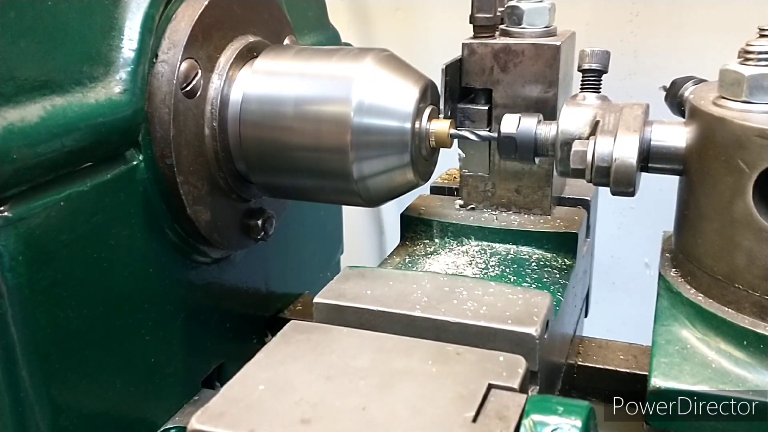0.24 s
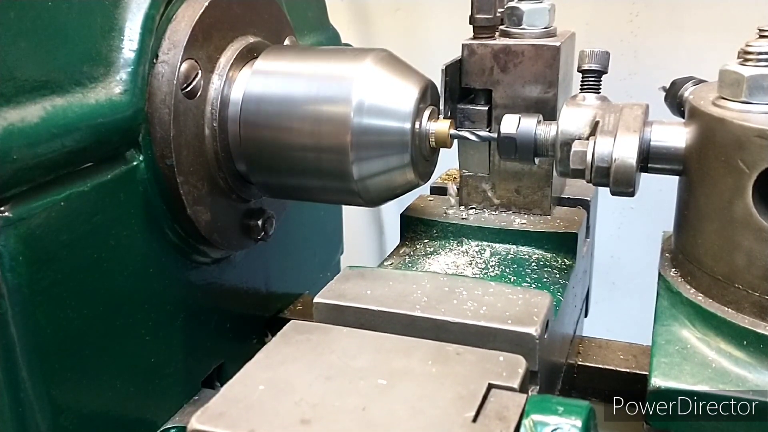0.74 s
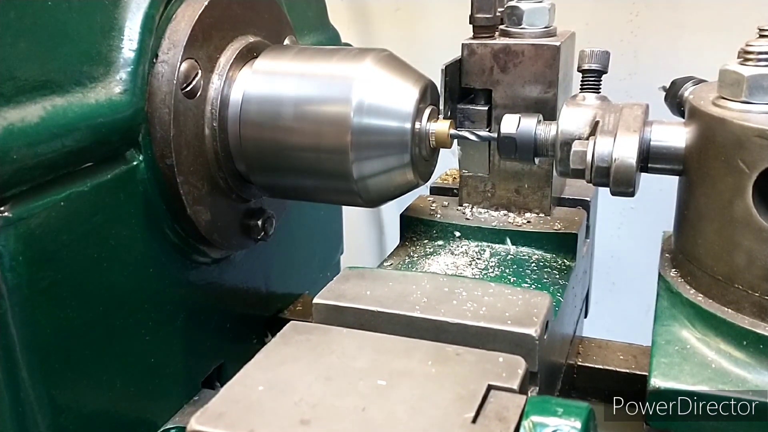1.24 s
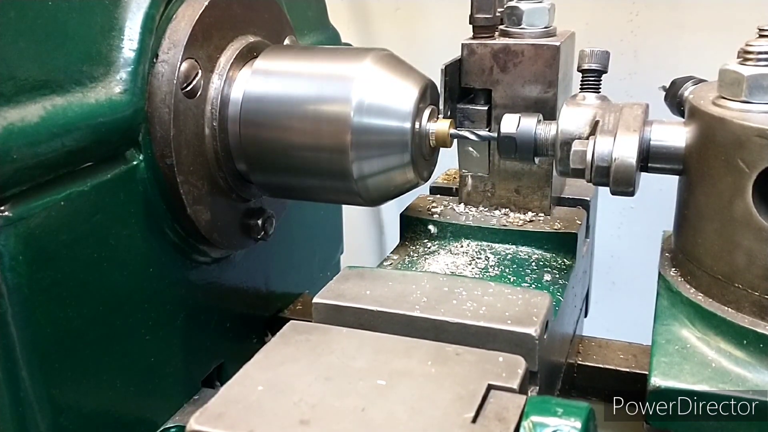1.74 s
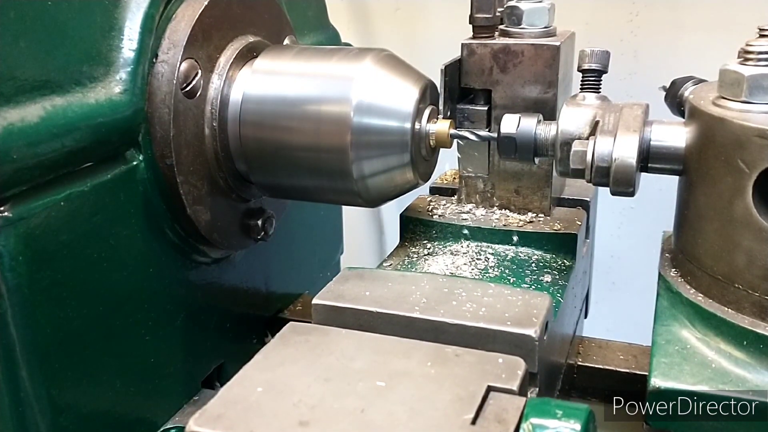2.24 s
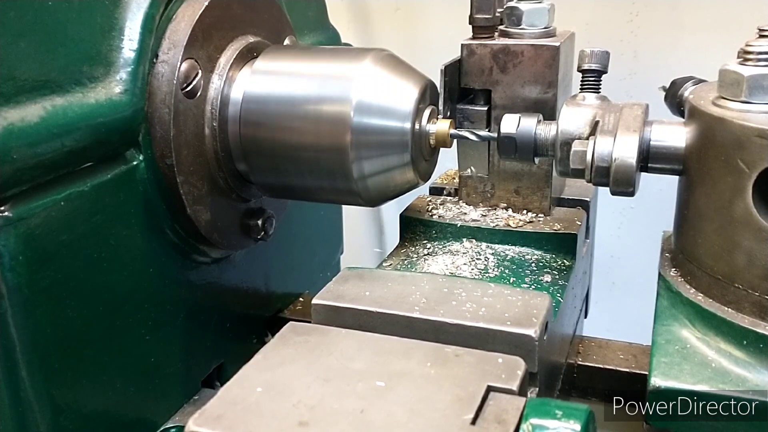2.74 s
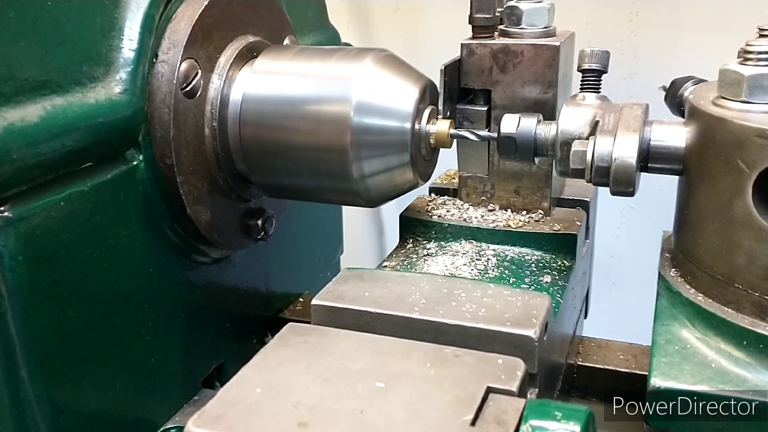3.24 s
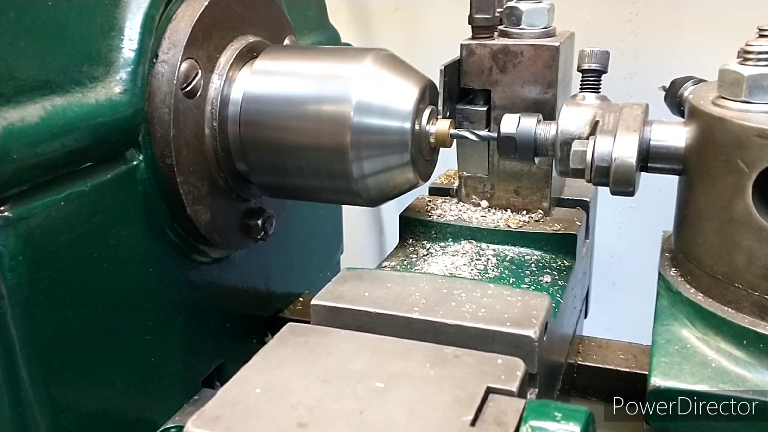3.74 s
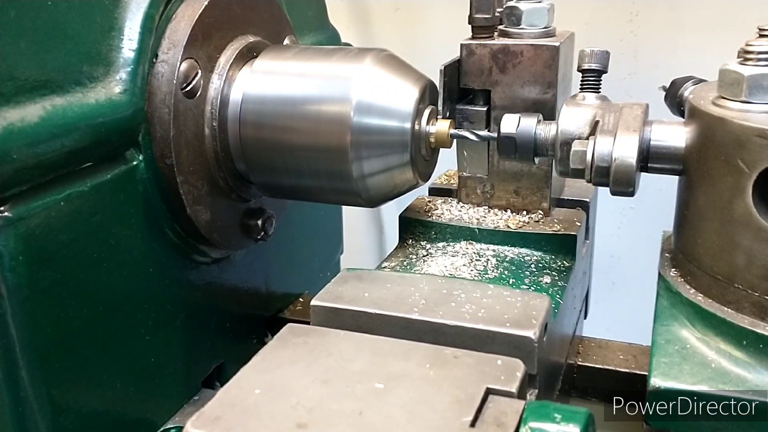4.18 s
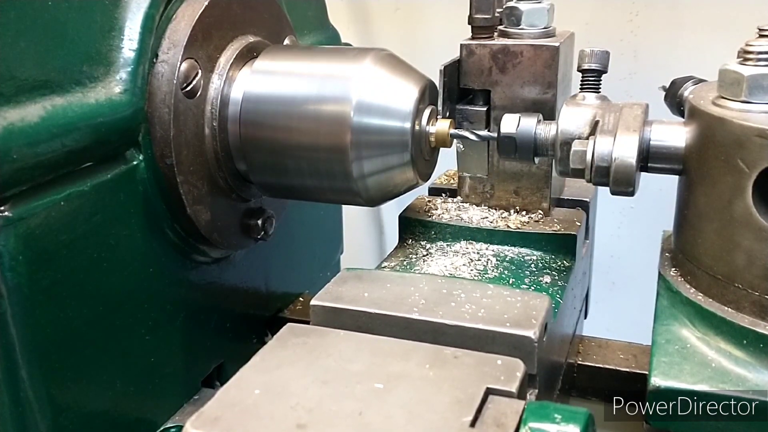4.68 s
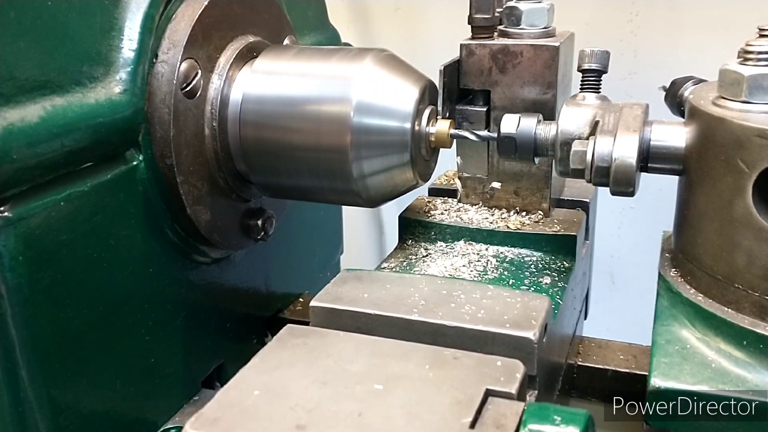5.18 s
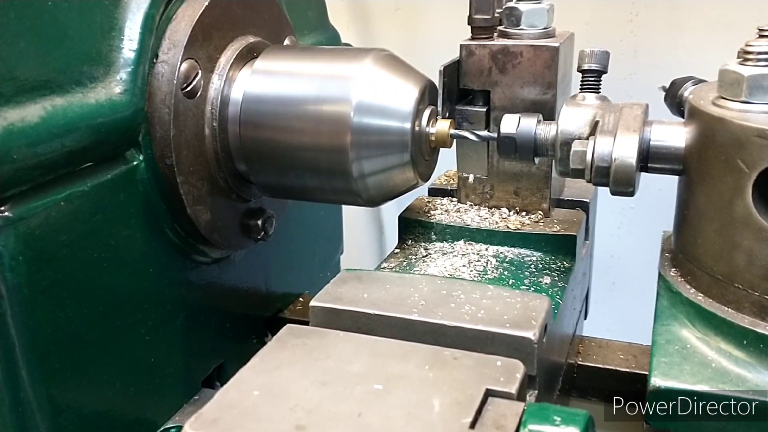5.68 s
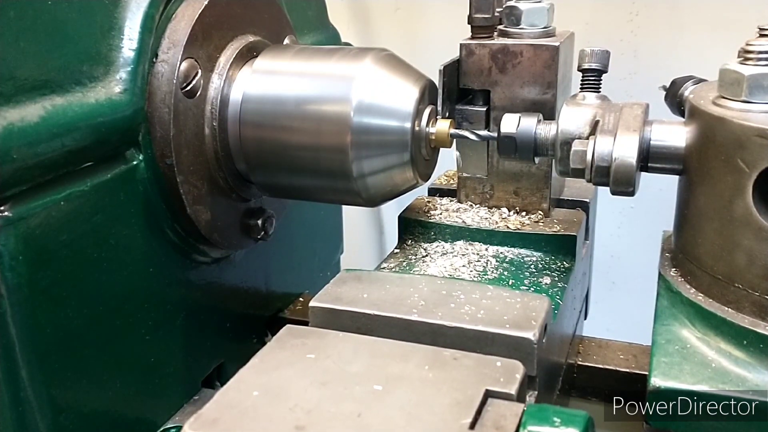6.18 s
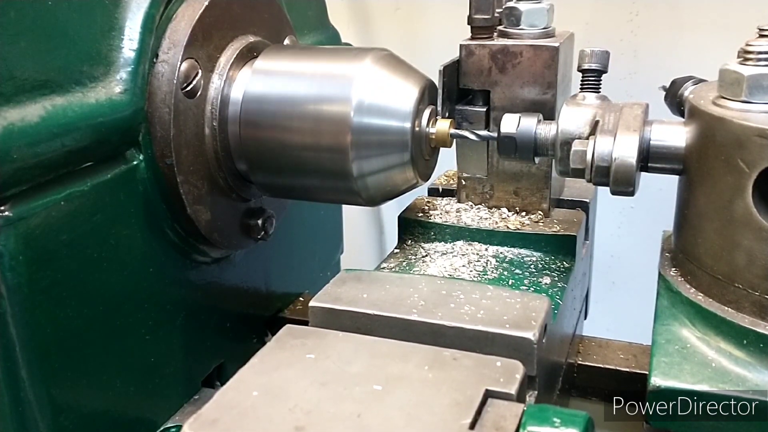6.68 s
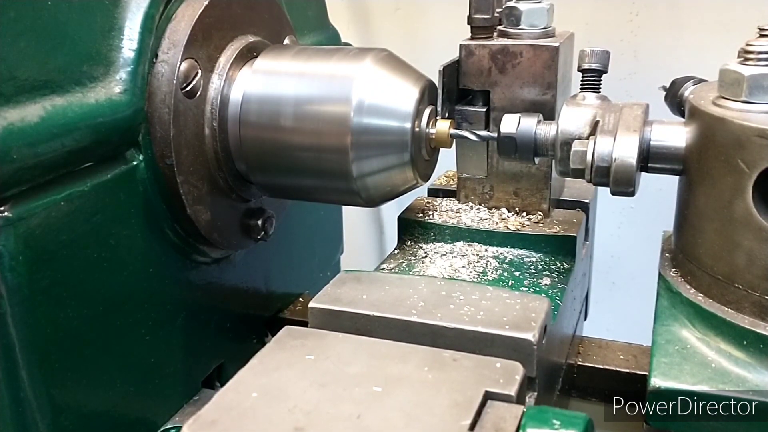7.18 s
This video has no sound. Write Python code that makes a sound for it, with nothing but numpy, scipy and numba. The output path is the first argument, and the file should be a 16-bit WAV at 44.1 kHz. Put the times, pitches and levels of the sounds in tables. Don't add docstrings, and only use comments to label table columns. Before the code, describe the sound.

Close stereo pickup in a small workshop: a lathe motor hums and whirrs while the spindle ticks about fifteen times a second. Brief scrapes and soft knocks come first, then a short lull. From one second the blade cuts brass in harsh, bright pulses about eight a second, each screech dipping in pitch at its deepest bite. They are loudest early, then grow lower, grainier and quieter to the end.

```python
import sys
import numpy as np
from scipy import signal
from scipy.fft import rfft, irfft, next_fast_len
from scipy.io import wavfile
from scipy.ndimage import uniform_filter1d
from numba import njit

SR = 44100
rng = np.random.default_rng(int(sys.argv[2]) if len(sys.argv) > 2 else 0)


def boost(x):
    u = np.asarray(x, float) / 20
    return 10 ** u


def to_wav(s):
    ch = np.atleast_2d(s).T
    pcm = np.round(np.clip(ch, -1, 1) * 32767)
    wavfile.write(sys.argv[1], SR, pcm.astype(np.int16))


N = 327222

SPINDLE_HZ, FIRST_TICK_S = 15.0027, .0548
# [t/s, level/dB]
GRAZES = [
    (.013, -63),
    (.078, -55),
    (.142, -53),
    (.21, -44.5),
    (.281, -37.5),
    (.349, -36.5),
    (.421, -29.5),
    (.493, -33),
    (.563, -48),
    (.63, -57),
]
GRAZE_HALF_S = .010


def set_rms(x, db):
    return x * boost(db) / np.sqrt(np.mean(x ** 2))


def walk(rate_hz):
    k = int(SR / rate_hz)
    held = np.repeat(rng.standard_normal(N // k + 1), k)
    return 1.3 * uniform_filter1d(uniform_filter1d(held, k), k)[:N]


def resonance(f, hz, width_hz):
    return 1 / (1 + 1j * (f / hz - hz / np.maximum(f, 1)) * hz / width_hz)


def colour(f, hz, db):
    return boost(np.interp(np.log(np.maximum(f, 1)), np.log(hz), db))


def causal(gain):
    cep = irfft(np.log(gain))
    half = cep.shape[-1] // 2
    return np.exp(rfft(cep * np.r_[1, np.full(half - 1, 2), 1, np.zeros(half - 1)]))


def smear(t60_s, direct):
    t = np.arange(SR // 4) / SR
    tail = rng.standard_normal((2, len(t))) * np.exp(-np.log(1000) * t / t60_s)
    tail = tail / np.sqrt(np.sum(tail ** 2, axis=1, keepdims=True))
    return tail + direct * (t == 0)


@njit
def svf(x, hz, k):
    low, high, b, l = np.empty(len(x)), np.empty(len(x)), 0., 0.
    for i in range(len(x)):
        g = np.tan(np.pi * hz[i] / SR)
        v = (b + g * (x[i] - l)) / (1 + g * (g + k))
        low[i] = l + g * v
        high[i] = x[i] - k * v - low[i]
        b, l = 2 * v - b, 2 * low[i] - l
    return low, high


def band(x, low_hz, high_hz):
    low_hz = np.clip(low_hz, 200, .4 * SR) + np.zeros(len(x))
    high_hz = np.clip(high_hz, 200, .45 * SR) + np.zeros(len(x))
    for _ in range(3):
        x = svf(x, low_hz, 1.025)[1]
    return svf(x, high_hz, 1.0)[0]


def motor():
    # [multiple, left/dB, right/dB, wobble/dB, left lead/rad]
    hum_lines = [(1, -40.3, -40.6, .15, -.06), (2, -53.5, -55, 1.8, .2), (3, -44, -47, .4, -.62),
                 (4, -53, -54.5, .6, -.55)]
    # [f/Hz, density/dB per Hz]
    whirr_spectrum = [(15, -62), (25, -19), (43, -18), (66, -13), (101, -4), (150, -8), (301, -7.5),
                      (515, -9.5), (1310, -11), (1730, -13.5), (2810, -14.5), (3310, -24), (6500, -33.5),
                      (8450, -75), (14300, -120)]
    # [f/Hz, width/Hz, level/dB]
    housing_modes = [(177.6, 3.4, -57), (251, 35, -54), (371.7, 5, -61.5)]
    t = np.arange(N) / SR
    turn = 2 * np.pi * np.cumsum(100.24 + 0.086 * walk(0.94)) / SR
    hum = np.zeros((2, N))
    for k, left_db, right_db, wobble_db, lead in hum_lines:
        gain = np.sqrt(2) * boost(np.array([[left_db], [right_db]]) + wobble_db * walk(8.3))
        hum += gain * np.sin(k * turn + 6 * rng.random() + lead * np.array([[1], [0]]))
    size = next_fast_len(N + 1)
    f = np.arange(size // 2 + 1) * SR / size
    mid, side = rfft(rng.standard_normal((2, size)))
    apart = np.clip(f / 1000, .27, 1.1) * np.array([[1], [-1]])
    whirr = irfft(colour(f, *np.transpose(whirr_spectrum)) * (mid + apart * side), size)
    whirr = set_rms(whirr, -46)[:, :N]
    whirr = whirr * boost(1.2 * np.cos(2 * np.pi * SPINDLE_HZ * (t - FIRST_TICK_S - .01)))
    housing = np.zeros(size)
    for hz, width_hz, db in housing_modes:
        noise = rfft(rng.standard_normal(size))
        housing += set_rms(irfft(resonance(f, hz, width_hz) * noise, size), db)
    return hum + whirr + housing[:N]


def rings(modes, tilt_db=0., spread=0., rise_s=0.0011):
    t = np.arange(SR // 8) / SR
    y = np.zeros(len(t))
    for hz, db, t60_s in modes:
        gain = boost(db + tilt_db * np.log2(hz / 1000) + 2 * rng.standard_normal())
        detuned_hz = hz * (1 + spread * rng.standard_normal())
        y += gain * np.sin(2 * np.pi * (detuned_hz * t + rng.random())) * np.exp(-np.log(1000) * t / t60_s)
    y = y * np.minimum(t / rise_s, 1)
    return y / np.abs(y).max()


def blows():
    # [f/Hz, level/dB, t60/s]
    tick_modes = [(822, 2.5, 0.085), (1168, 8.5, 0.058), (1386, 4, 0.08), (1659, 10, 0.089),
                  (1762, 14, 0.058), (2085, 11.5, 0.044), (2590, 11.5, 0.02), (2960, -11, 0.046)]
    # [f/Hz, level/dB, t60/s]
    knock_modes = [(566, 3, 0.084), (665, 16, 0.062), (855, 18, 0.017), (1037, 18, 0.035), (1424, 5.5, 0.1),
                   (1760, 10, 0.016), (2190, 7.6, 0.011), (2590, 6.7, 0.025), (2950, 10, 0.023),
                   (3460, 6, 0.011)]
    # [t/s, peak/dB, brightness/dB per octave]
    knocks = [
        (0.019, -39, -1),
        (0.085, -39, -2),
        (0.153, -38.5, -1),
        (0.22, -37, -0.5),
        (0.284, -33.5, 3),
    ]
    out = np.zeros(N + SR)
    for s in FIRST_TICK_S + np.arange(int(N / SR * SPINDLE_HZ)) / SPINDLE_HZ:
        i = int((s + 0.000532 * rng.standard_normal()) * SR)
        out[i:i + SR // 8] += boost(-39 + 1.2 * rng.standard_normal()) * rings(tick_modes, spread=0.012)
    for s, db, tilt_db in knocks:
        for late_s, bounce_db in ((0, 7.5), (.007, 1), (.015, -8)):
            i = int((s + late_s) * SR)
            knock = rings(knock_modes, tilt_db, spread=0.0097, rise_s=0.00067)
            out[i:i + SR // 8] += boost(db + bounce_db) * knock
    return signal.fftconvolve(out[None, :N], smear(.12, 1.3), axes=1)[:, :N]


def bites():
    # [deepest t/s, level/dB, needle rate there/Hz, dig in/ms, spring out/ms]
    rim_bites = [(1.005, -33.5, 6870, 46, 40), (1.091, -28.5, 7350, 31.5, 32), (1.178, -27.5, 6770, 35, 39),
                 (1.278, -23.5, 6660, 44, 37), (1.372, -17, 5890, 43, 39), (1.475, -18.5, 6585, 40, 35.5),
                 (1.596, -21.5, 5670, 45.0, 52), (1.729, -19.5, 5463, 41.0, 31),
                 (1.833, -16.5, 5240, 49.6, 41), (1.95, -15.5, 5150, 30.5, 58.7),
                 (2.074, -16, 4800, 57.3, 36.6), (2.174, -16, 4786, 52, 47), (2.297, -16, 4740, 54.0, 45),
                 (2.42, -17.5, 4132, 48, 61), (2.562, -16.5, 4415, 60.3, 54), (2.698, -17, 4240, 56.4, 56),
                 (2.815, -19.5, 5290.0, 45.4, 39), (2.907, -18, 5050, 47.5, 47), (3.012, -22, 5280, 40, 55),
                 (3.105, -21.5, 5447, 60, 70), (3.165, -23.5, 6315, 60, 55), (3.241, -21.5, 5210, 41, 46.3),
                 (3.364, -18.5, 4063, 35.5, 64), (3.492, -17.5, 3798.0, 45, 59),
                 (3.625, -17, 3778, 61.3, 54.3), (3.757, -19, 3802, 45, 59.5), (3.9, -19, 4068, 48, 93)]
    # [deepest t/s, level/dB, needle rate there/Hz, dig in/ms, spring out/ms]
    core_bites = [(4.045, -20.5, 4238, 67.5, 45.4), (4.163, -22.5, 3686, 52, 56),
                  (4.297, -21.5, 3995, 57.5, 50.3), (4.437, -22, 4333, 35, 45),
                  (4.559, -22, 3810, 53, 58.5), (4.671, -21.5, 4100, 36.5, 43),
                  (4.765, -23, 4100, 47, 45.7), (4.88, -23, 3468, 54, 48.4), (5.005, -22, 2950, 34.5, 77),
                  (5.155, -18.5, 2783, 40.8, 66), (5.29, -26.5, 3950, 30.4, 44.5),
                  (5.426, -25, 3372, 31, 47), (5.573, -26, 3086, 49, 43.4), (5.68, -22.5, 2810, 44, 62),
                  (5.825, -21, 2458, 39.2, 62.5), (5.981, -24.5, 2784, 62.5, 47.3),
                  (6.1, -22, 2252, 55, 46), (6.23, -23.5, 2376, 62, 48), (6.383, -27, 2455, 52, 58.6),
                  (6.541, -24.5, 2251, 38.7, 47.5), (6.683, -27, 2340, 41, 46), (6.8, -28, 2438, 58, 94),
                  (6.988, -27, 2285, 53.3, 39), (7.104, -28.5, 2342, 44.3, 43),
                  (7.235, -29.5, 2237, 54, 51.4), (7.385, -28.5, 1834, 60, 64)]
    graze_s, graze_db = np.transpose(GRAZES)
    mid_s, db, hz, in_ms, out_ms = np.transpose(rim_bites + core_bites)
    flat = np.ones(len(GRAZES))
    brush_s = 1.5 * GRAZE_HALF_S * flat
    return (np.r_[graze_s, mid_s], np.r_[graze_db + 2.5, db], np.r_[11285 * flat, hz],
            np.r_[brush_s, in_ms * 1e-3], np.r_[brush_s, out_ms * 1e-3])


def chip():
    mid_s, db, low_hz, in_s, out_s = bites()
    t = np.arange(N) / SR
    share = out_s[:-1] / (out_s[:-1] + in_s[1:])
    bite = np.searchsorted(mid_s[:-1] + share * np.diff(mid_s), t)
    late_s = t - mid_s[bite]
    off = np.abs(late_s) / np.where(late_s < 0, in_s[bite], out_s[bite])
    thick = uniform_filter1d(np.clip(1 - off ** 2.4, .002, 1), size=200)
    hz = uniform_filter1d(low_hz[bite], size=400) * thick ** -.8 * np.exp(.018 * walk(150))
    return np.minimum(hz, 15000), boost(uniform_filter1d(db[bite], size=400)) * thick


def bed():
    # [f/Hz, width/Hz, level/dB]
    bed_modes = [(826, 73, 7.5), (1116, 136, 6.5), (1560, 500, -2.5)]
    hz, force = chip()
    push = rng.standard_normal((2, N)) * force * boost(-16.5 - 9 * np.log2(hz / 4000))
    size = next_fast_len(N + 1)
    f = np.arange(size // 2 + 1) * SR / size
    response = sum(boost(db) * resonance(f, hz, width_hz) for hz, width_hz, db in bed_modes)
    return irfft(rfft(push, size) * response, size)[:, :N]


def rubbing():
    # [t/s, level/dB]
    flank = [(0, -33.5), (.05, -60), (.18, -58), (.3, -45), (.5, -41), (.61, -48), (.86, -42.5),
             (1.05, -24), (1.3, -22.5), (1.9, -24.5), (2.2, -19), (2.6, -24), (3.7, -19), (4.3, -23.5),
             (5.2, -25.5), (5.5, -28), (6.1, -27.5), (7.3, -34)]
    mid_s, _, low_hz, *_ = bites()
    t = np.arange(N) / SR
    slowest_hz = np.interp(t, mid_s, low_hz)
    edge_hz = np.minimum(uniform_filter1d(slowest_hz, size=SR // 5), 7400)
    scrape = sum(boost(db + 8.5) * np.exp(-((t - s) / GRAZE_HALF_S) ** 2) for s, db in GRAZES)
    contact = uniform_filter1d(np.clip(slowest_hz / chip()[0], 0, 1), size=SR // 60)
    press = boost(np.interp(t, *np.transpose(flank)) + 2.0 * (contact - 0.56))
    press = press + scrape * boost(3.6 * walk(300))
    grit = rng.standard_normal((2, N)) * press * boost(-5.0 + 1.3 * walk(120))
    low = boost(-11.5) * band(grit[0], 2450, 2900) * np.clip((7000 - edge_hz) / 2000, 0, 1)
    ports = [band(grit[0] + side * .9 * grit[1], edge_hz, 6.2 * edge_hz) for side in (1, -1)]
    return low + np.array(ports)


@njit
def shear(step, force, stretch, size):
    out, p, k = np.zeros(len(step) + 1), 0., 0
    for i in range(len(step)):
        d = step[i] * stretch[k]
        p += d
        if p >= 1:
            p, k = p - 1, k + 1
            out[i] += force[i] * size[k] * p / d
            out[i + 1] += force[i] * size[k] * (1 - p / d)
    return out[:-1]


def needles():
    fine = 4
    hz, force = chip()
    force = force * boost(2.1 * walk(250)) * np.sqrt(SR / hz) * fine
    chance = rng.standard_normal((N // 2, 2)).T
    nth = np.cumsum(hz) / SR
    loose = np.interp(np.arange(N // 2), nth, uniform_filter1d(hz, size=800) / 4000) ** .7
    stretch, size = np.exp(.05 * chance[0] * loose), boost(2.8 * chance[1])
    clicks = shear(np.repeat(hz / SR / fine, fine), np.repeat(force, fine), stretch, size)
    clicks = signal.resample_poly(clicks, 1, fine)
    even = svf(band(clicks, .74 * hz, 4.2 * hz), np.clip(.7 * hz, 200, .4 * SR), 1.2)[1]
    shake = svf(band(clicks, 2400, 3000), np.minimum(0.56 * hz, 3000), 2.24)[0]
    stir = band(clicks, 4000, 5600) * np.clip((hz - 5000) / 1500, 0, 1)
    return even + boost(-4.0) * shake * (4500 / hz) ** 0.92 + boost(-10.5) * stir


def cut():
    # [f/Hz, width/Hz, left/dB, right/dB, left lead/rad]
    slide_modes = [(2404, 130, 14, 14.5, -1.5), (2605, 46.1, 5, -4, -6.5), (2940, 195, 19, 9.5, -1),
                   (3321, 53.8, -6, -2, -2.5), (3460, 220, 15, 10.5, -4), (3716, 109.4, 16, 4.5, -5),
                   (4100, 161.3, 9, 12.5, -6), (4505, 66, 13, 11.5, -9), (4651, 59, 13, 12, -5),
                   (4910, 110, 8.5, -1, -5), (5250, 43, -5.5, 3, -2), (5265, 49, 8, 8, -1.4),
                   (5274, 50, 16.5, -5, 5), (5400, 85, -8, 6, -2)]
    # [f/Hz, width/Hz, left/dB, right/dB, left lead/rad]
    post_modes = [(5585, 52, -5, 7.5, -2), (5740, 39, 11.5, -5.2, -2.5), (6100, 240, 7.5, -18, 0.5),
                  (6270, 370, 13, -0.5, 4.5), (6677, 137, 19.5, 7, 1.14), (7130, 55, -4, 12, 2.7),
                  (7246, 220, 15, 8, -1), (7710, 87, -6.5, 14.5, -2.5), (7940, 110, 4, 2, -4.5),
                  (8650, 88, 5.5, 7, -5), (8830, 190, 11, 0, -3.5), (9120, 75, -8, -8, -4.5),
                  (9780, 230, 1.5, -2, -4.5)]
    # [f/Hz, width/Hz, left/dB, right/dB, left lead/rad]
    blade_modes = [(11230, 353, 8.9, 10.0, -4.3), (11370, 83, 13.2, 3.7, -7.0),
                   (11510, 113, 14.0, 0.7, -4.1), (12360, 69, 8.0, -8, -1.5), (12640, 232, 4.6, 0.6, -2.0),
                   (12980, 399, 6.2, 6.8, -4.8), (13650, 80, 1.0, 5.8, -2.5), (14400, 380, 8.9, 15.6, 0.6),
                   (14890, 288, 7.6, 18.0, -2.2)]
    # [f/Hz, left/dB, right/dB]
    casting = [(500, 1, -21), (1500.7, 2, -14.5), (1830, -7, 7), (2109, 2, 3), (2245, 0.5, -17),
               (2502, -5, 5.5), (2816, -12, 0.5), (3193.5, -7.5, -4), (3318, -11, -7.5), (3540, -9, -3.5),
               (4000, -5.5, -4.5), (3940, 1, -4), (5770, -3.5, -2.5), (6380, -9.5, -0.5), (8240, 3, -5),
               (9020, 0.3, 1.5), (10000, 1.5, -0.5), (11500, -1, -3.5), (12650, -3.5, -12),
               (15100, -11, -14.5)]
    size = 2 ** 14
    f = np.arange(size // 2 + 1) * SR / size
    mode_hz, width_hz, left_db, right_db, lead = np.transpose(slide_modes + post_modes + blade_modes)
    rise = np.abs(resonance(f, mode_hz[:, None], width_hz[:, None])) ** 4
    power = 1 + boost(2 * np.array([left_db, right_db])) @ rise
    hz, *casting_db = np.transpose(casting)
    diffuse = np.array([colour(f, hz, db) for db in casting_db])
    tails = rfft(smear(.045, .7), size)
    gain = np.sqrt(power) * diffuse * np.abs(tails) ** .3
    scattered = tails[0] / np.abs(tails[0])
    ahead = .5j * np.interp(f, mode_hz, lead) * np.array([[1], [-1]])
    path = scattered * np.exp(ahead - 2j * np.pi * f * 128 / SR)
    body = irfft(causal(gain) * path, size)[:, :size // 2]
    return signal.fftconvolve(needles() + rubbing(), body, axes=1)[:, 256:N + 256]


def scene():
    return motor() + blows() + bed() + cut()


def top_cut(x):
    return signal.sosfilt(signal.butter(12, 15700, fs=SR, output="sos"), x)


def record(dry):
    loud = uniform_filter1d(np.mean(dry ** 2, axis=0), size=SR // 3)
    held = dry * (1 + loud / boost(-60)) ** -.06
    hiss = boost(-64) * rng.standard_normal(dry.shape)
    rounded = np.tanh(1.25 * held + hiss) * .98
    top = signal.ellip(10, .2, 80, 15350, fs=SR, output="sos")
    return top_cut(signal.sosfilt(top, rounded))


dry = scene()
out = record(dry)
to_wav(out)
```